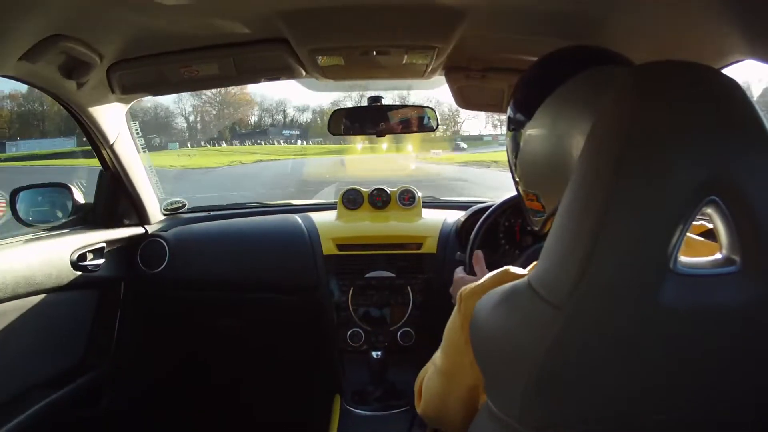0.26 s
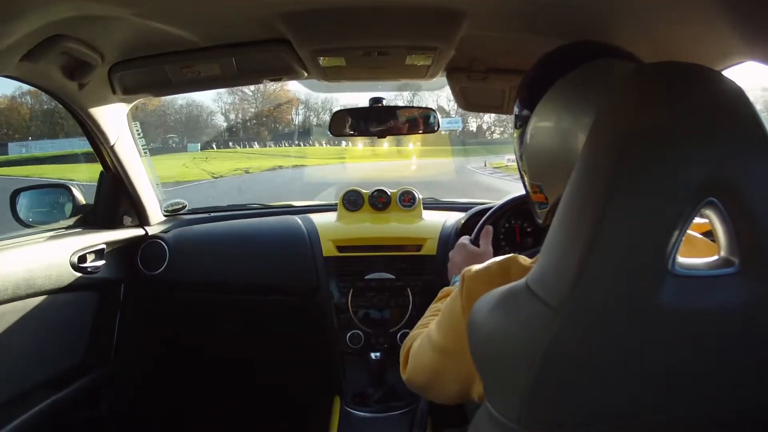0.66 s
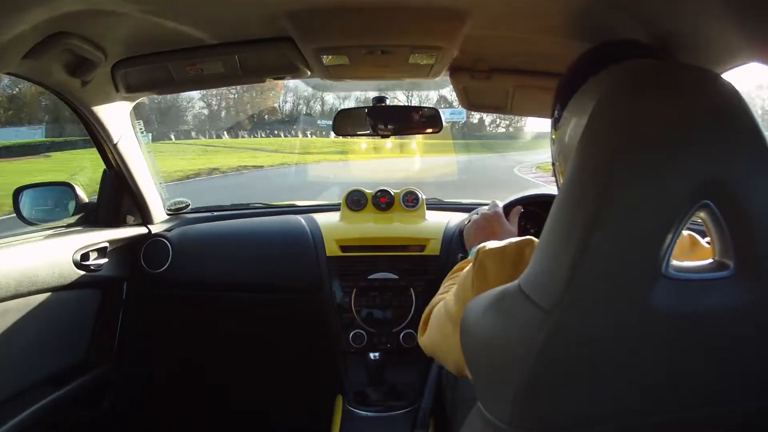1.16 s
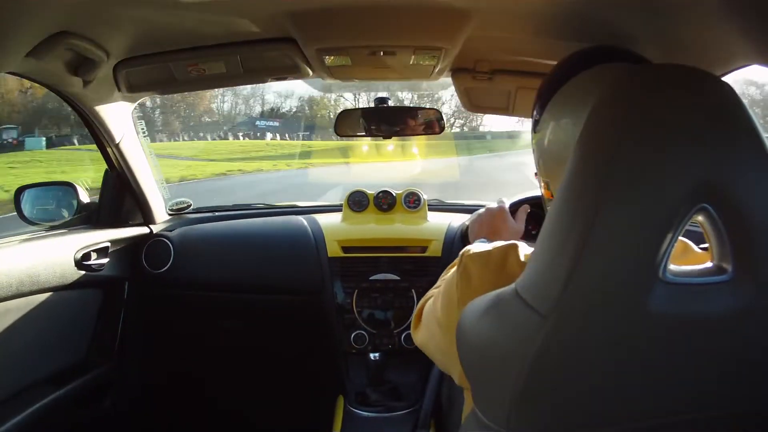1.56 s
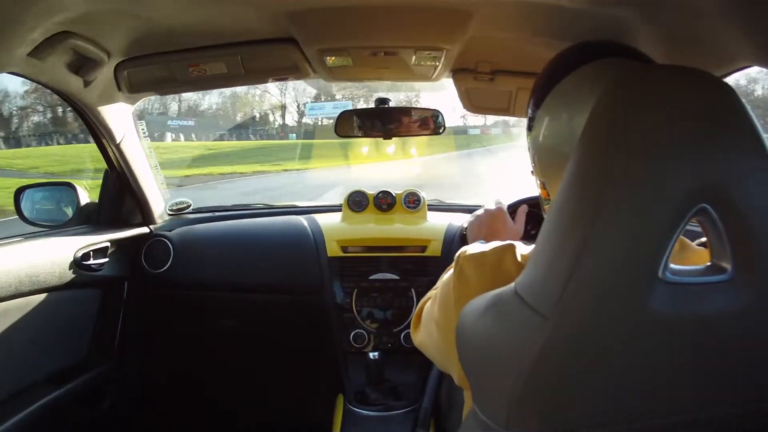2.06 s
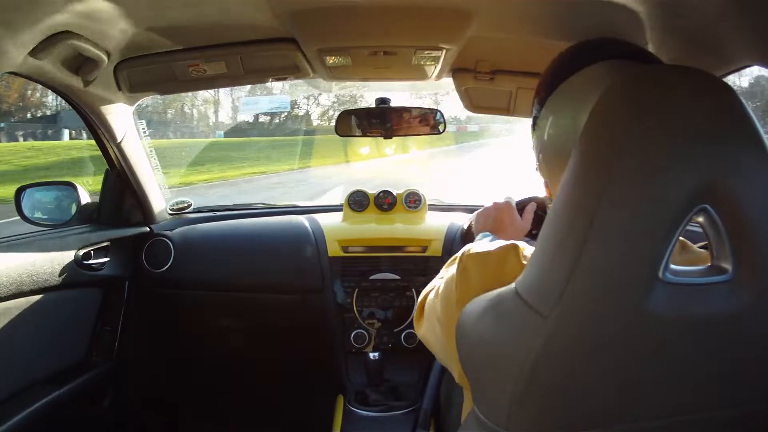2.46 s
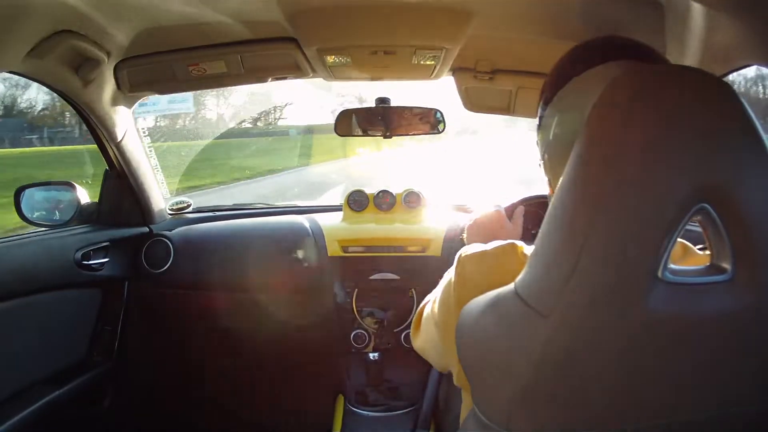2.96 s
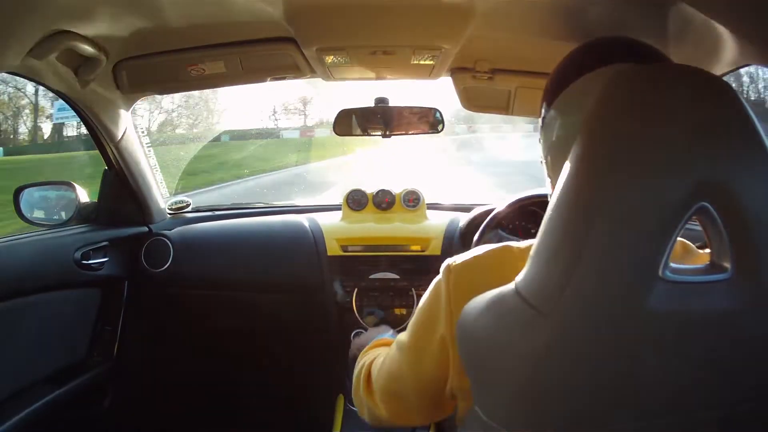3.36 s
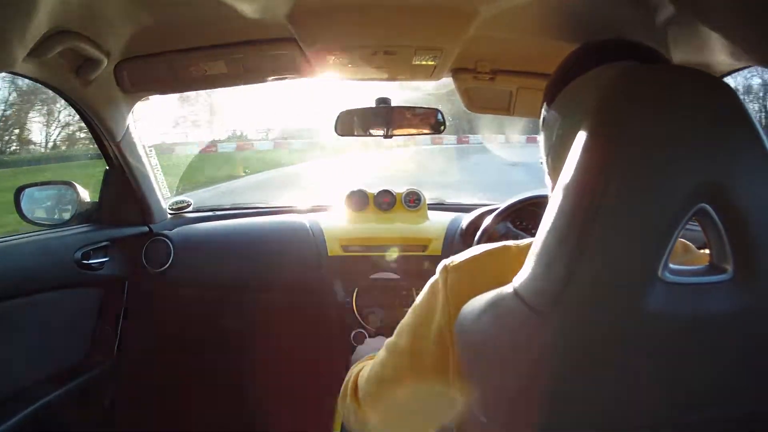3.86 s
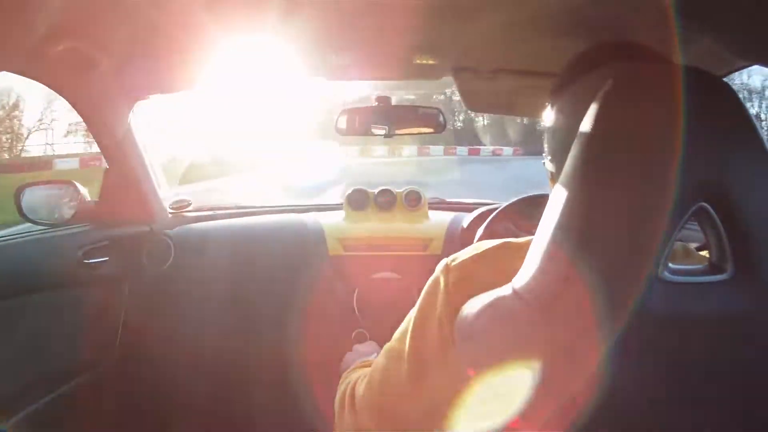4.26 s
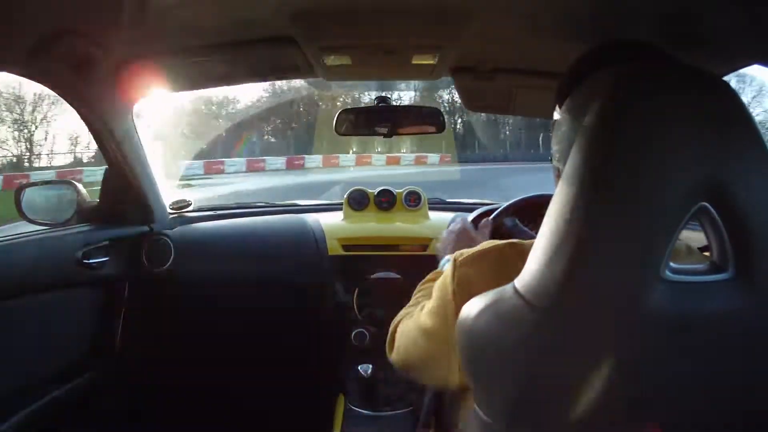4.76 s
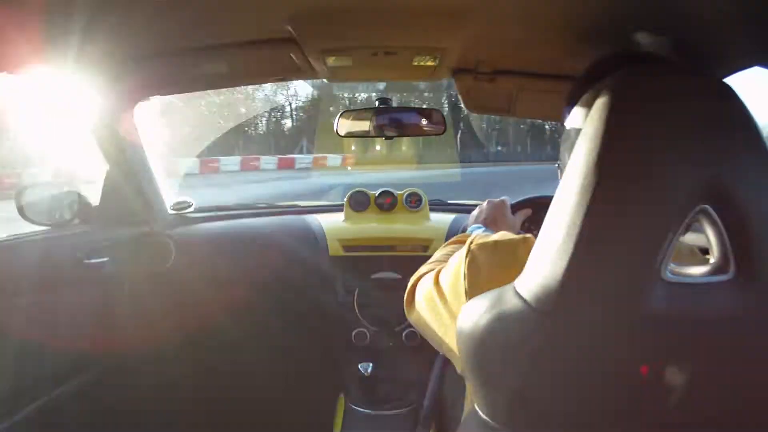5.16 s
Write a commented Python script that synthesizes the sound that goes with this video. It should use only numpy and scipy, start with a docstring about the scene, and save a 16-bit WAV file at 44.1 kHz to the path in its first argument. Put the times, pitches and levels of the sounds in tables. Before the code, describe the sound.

Inside a closed car on a circuit, a smooth rotary engine hum and driveline whine slide down as the car slows, under heavy low air buffeting and tyre rumble. Ticks and thumps come early, trim knocks around 1.4 seconds. The throttle is blipped at about 4.1 seconds and again just after 5, with light tyre scrub. One dull, hissing cabin microphone.

```python
"""Inside a closed car slowing for a corner on a circuit, heard through one dull, hissing microphone.
From the start a two-rotor engine hums (sines at multiples of its shaft speed), the driveline whines and the
tyres hum (sines that fall with road speed), and coloured noise makes the air pressure, boom and tyre roar.
Small ticks, rough swells of noise and low thumps soon join in; trim knocks follow from 1.4 s.
The engine is blipped at about 4.1 s and again after 5 s, as the tyres scrub on turning in."""
import sys
import numpy as np
from scipy.fft import rfft, irfft, next_fast_len
from scipy.io import wavfile
from scipy.ndimage import map_coordinates

SR = 44100
rng = np.random.default_rng(int(sys.argv[2]) if len(sys.argv) > 2 else 0)


def output_pcm(signal):
    """Save a mono or channel-first signal as 16-bit PCM at the path in sys.argv[1].

    Samples are clipped to [-1, 1] before scaling.
    """
    pcm = np.clip(np.atleast_2d(signal).T, -1, 1) * 32767
    wavfile.write(sys.argv[1], SR, np.round(pcm).astype(np.int16))


N = 238713  # length in samples

# engine shaft speed: t/s, f/Hz
SHAFT_SPEED = [(0.0, 120.3), (0.6, 118.0), (1.2, 116.4), (1.7, 113.7), (2.2, 112.9), (2.7, 111.7),
               (3.2, 108.7), (3.7, 105.3), (4.02, 99.7), (4.13, 115.0), (4.3, 111.6), (4.5, 106.9),
               (4.75, 100.7), (4.95, 96.7), (5.1, 108.3), (5.3, 119.4), (5.41, 118.9)]
# engine strength before cabin colour: t/s, second order level/dB, third order level/dB, upper orders level/dB
ENGINE_LOAD = [(0.0, -31, -35.5, -58.5), (.25, -32.5, -34, -45), (.55, -33, -36, -49),
               (.8, -29.5, -33.5, -46), (1.15, -37.5, -33.5, -44), (1.3, -31, -44.5, -51),
               (1.62, -41, -35.5, -49.5), (1.78, -51, -34.5, -40), (2.1, -34.5, -39, -48),
               (2.4, -36, -35.5, -51.5), (2.8, -35, -38.5, -52.5), (3.4, -30.5, -47, -49),
               (3.8, -32.5, -49, -54), (4.02, -25.5, -45, -53), (4.08, -16.5, -32, -46),
               (4.14, -21.5, -35, -39.5), (4.25, -33.5, -46, -51), (4.6, -29.5, -37, -54),
               (4.9, -36.5, -57, -49), (5.08, -23.5, -35, -54), (5.25, -45.5, -40.5, -53)]
# upper engine orders: multiple of shaft speed, level/dB relative to the upper orders' strength
UPPER_ORDERS = [(4, 3), (5, -1), (6, -0.5), (8, -19), (10, -20.5)]
# how the cabin favours some pitches of the engine: f/Hz, level/dB
CABIN_COLOUR = [(190, -1), (215, 3), (260, -4.5), (310, -5), (350, 1.5), (390, 3.5), (430, 4), (480, -6.5),
                (522, 1), (600, -4.5), (700, 1), (1000, 2.5)]
# driveline whine pitch: t/s, f/Hz
WHINE_PITCH = [(0.0, 276.4), (0.6, 273.0), (1.4, 266.5), (2.16, 262.0), (2.7, 260.3), (3.2, 253.0),
               (3.95, 242.9), (4.4, 236.1), (4.8, 225.0), (5.1, 214.9), (5.41, 197.8)]
# rolling tones: t/s, whine level/dB, its octave level/dB, tyre hum level/dB, its octave level/dB
ROLLING_LEVELS = [(0, -49.5, -65.5, -44, -41), (.5, -32, -43.5, -22.5, -39.5), (1.0, -38, -58, -28, -31),
                  (1.3, -42.5, -49.5, -34, -45), (1.7, -37, -43, -24.5, -26),
                  (2.2, -32.5, -42.5, -31.5, -35.5), (2.8, -32.5, -37, -27, -29.5),
                  (3.3, -33.5, -45, -33, -29.5), (3.9, -34, -39.5, -35, -33), (4.15, -31, -51, -29, -32.5),
                  (4.45, -32.5, -38.5, -24.5, -30.5), (4.62, -31.5, -50.5, -34, -31),
                  (4.9, -31, -32, -35, -28), (5.2, -36.5, -32, -25, -43), (5.41, -25, -49, -23.5, -49)]
# whine two octaves up: t/s, level/dB
WHINE_TWO_OCTAVES_UP = [(0, -64), (.8, -57), (1.1, -72.5), (3.1, -78), (3.6, -61.5), (4.1, -59.5),
                        (4.3, -77.5), (4.9, -78), (5.1, -70), (5.41, -66)]
# a short extra whine, mostly just before the second blip: t/s, f/Hz, level/dB
LATE_WHINE_PATH = [(4.6, 544.5, -68.5), (4.68, 540, -42.5), (4.8, 522, -41), (5.0, 532.5, -39.5),
                   (5.08, 516, -70)]
# road through the body: t/s, pressure buffet level/dB, body boom level/dB, drone level/dB, tyre roar level/dB
ROAD_LEVELS = [(0.0, 2.5, -15.5, -24, -36.5), (.15, -16, -22.5, -28, -35), (.35, -13.5, -21, -27.5, -38),
               (.6, -14, -26, -31.5, -34), (1.1, -15, -26.5, -29.5, -38.5),
               (1.5, -14.5, -23.5, -29.5, -35.5), (2.0, -12.5, -23, -29.5, -36.5),
               (2.4, -15, -26.5, -29, -38), (2.65, -14, -23, -28.5, -39), (3.2, -15, -23.5, -29.5, -38),
               (3.75, -13.5, -24, -30.5, -42), (4.1, -13.5, -22.5, -24, -36.5),
               (4.4, -12.5, -23, -34, -36.5), (4.75, -15, -21, -30.5, -40.5),
               (5.1, -12.5, -26.5, -30.5, -35.5), (5.41, -14.5, -13, -28.5, -37)]
# noise colours of the road layers, from low to high: f/Hz, relative level/dB
BUFFET_COLOUR = [(1.8, -46), (3.0, 2.5), (21, 4), (38, 0.5), (60, -7), (78, -48.5), (130, -120)]
BOOM_COLOUR = [(35, -15.5), (60, 1.5), (103, 1.5), (151, -1.5), (166, -5.5), (185, -19.5), (240, -55),
               (410, -120)]
DRONE_COLOUR = [(110, -40), (185, -5.5), (220, 1), (285, -4.5), (344, -6.5), (376, -16.5), (400, -13.5),
                (520, -37), (880, -120)]
ROAR_COLOUR = [(240, -34), (400, 3), (523, -7.5), (615, -9.5), (693, -13), (747, -15), (900, -20),
               (1170, -61.5), (1980, -120)]
RUSH_COLOUR = [(530, -41), (900, -6.5), (997, 0.5), (1060, -8), (1320, -1), (1420, -9), (1750, -21),
               (2320, -27.5), (3500, -32.5), (4550, -59), (7700, -120)]
# noise colour of the preamp hiss: f/Hz, relative level/dB
HISS_COLOUR = [(1290, -32), (2200, -3), (5150, -4), (6150, -5), (6400, -3), (6880, -4), (9260, -2.5),
               (14300, -2.5), (15000, -3.5)]
# faint steady whistles: f/Hz, level/dB
WHISTLES = [(6476, -89.5), (6525, -82), (9098, -82.5)]
# dry ticks without ring: t/s, step level/dB
TICK_STEPS = [(.021, -30), (0.033, -35), (0.036, -45), (0.044, -40.5), (0.056, -37.5), (0.059, -29.5),
              (0.065, -41), (0.085, -28), (.091, -23.5), (0.097, -31.5), (.166, -34), (.186, -31.5),
              (0.235, -41.5), (.59, -37.5), (0.974, -38.5), (1.631, -36.5), (2.0, -35.5), (3.685, -32.5),
              (3.953, -35), (4.116, -37.5), (4.129, -33), (4.187, -35.5), (4.309, -33.5), (4.66, -38),
              (4.892, -28.5), (5.285, -40), (5.295, -25.5), (5.303, -37.5), (5.351, -45), (5.38, -30),
              (5.403, -28.5)]
# rough swells of noise: t/s, length/s, low part level/dB, middle part level/dB, high part level/dB
ROUGH_SWELLS = [(0.059, 0.094, -26.5, -37.5, -49.5), (0.218, 0.1, -35, -40, -49),
                (1.404, 0.049, -32, -33.5, -46), (1.683, 0.16, -47, -43, -53),
                (4.04, .11, -24, -33.5, -52.5), (4.485, 0.096, -36, -40, -45),
                (5.265, 0.068, -32, -43, -56)]
# the three resonances of the rough swells: f/Hz, width/Hz
ROUGH_RESONANCES = [(350, 170), (540, 200), (860, 260)]
# low thumps, pressure pushes and one exhaust burst:
# t/s, ring f/Hz, level/dB before the soft onset, time to fall 60 dB/s
LOW_THUMPS = [(0.066, 21.2, 2.5, 0.22), (0.083, 96.7, -1.5, 0.42), (.21, 93.3, -3, 0.196),
              (.105, 234.8, -12.5, .3), (.27, 165, -12, 0.19), (4.05, 204.2, -11, 0.32),
              (4.881, 29, 1.5, 0.18), (5.277, 35.9, 1, 0.2), (5.388, 25.3, 1.5, 0.3)]
# trim knocks: t/s, strike level/dB, low modes level/dB, high modes level/dB, time to fall 60 dB/s
TRIM_KNOCKS = [(1.412, -46.5, 34, 14, 0.022), (1.419, -39, 22.5, -10, 0.073), (1.452, -51, 5, -6, .08),
               (1.474, -50, 5, -8, .05), (1.485, -48, 13, -10, .05), (1.497, -39.5, 19, -8, 0.054),
               (1.545, -33.5, 6, -6.5, .015), (1.902, -46, 6.5, -22, .02), (2.126, -37.5, -6, -18.5, .02),
               (5.288, -19, 6, -3, 0.01)]
# trim resonances in low, middle and high groups: f/Hz, width/Hz, level/dB
TRIM_MODES = [
    [(1050, 370, -0.5)],
    [(2760, 1700, 0.0017)],
    [(4800, 990, -2.5), (9000, 8700, -14)],
]
# tyre scrub at turn-in: t/s, length/s, level/dB
SCRUB_SWELLS = [(5.03, .36, -51), (5.055, .04, -55), (5.105, 0.036, -52), (5.18, 0.053, -53),
                (5.265, 0.045, -50)]
# tyre scrub resonances: f/Hz, width/Hz, level/dB
SCRUB_MODES = [(980, 74, 0), (1160, 140, -2)]

WHINE_TO_HUM = 3.38  # whine pitch divided by tyre hum pitch
RUSH_DB = -54
RUSH_FOLLOWS = 0.35  # share of the roar's swings, in dB
HISS_DB = -62.5
TOP_HZ = 15250  # nothing is heard above this


def amp(db):
    """Turns decibels into a gain."""
    return 10 ** (np.asarray(db) / 20)


def unit(x):
    """Scales a sound to an rms strength of 1."""
    return x / np.sqrt(np.mean(x ** 2) + 1e-20)


def curves(rows):
    """Draws straight lines between table rows: one curve for each column after the time."""
    times, *columns = np.transpose(rows)
    return [np.interp(np.arange(N) / SR, times, column) for column in columns]


def wobble(rate):
    """A smooth random curve through `rate` random points a second."""
    points = rng.standard_normal(int(N * rate / SR) + 4)
    return map_coordinates(points, [np.arange(N) * rate / SR])


def filtered(x, response):
    """Changes the strength and phase of each frequency in x by a response curve."""
    size = next_fast_len(N + SR // 2)  # spare room for ringing
    spectrum = rfft(x, size) * response(np.fft.rfftfreq(size, 1 / SR))
    return irfft(spectrum, size)[..., :N]


def noise(colour):
    """Noise of rms 1, coloured along a log frequency axis."""
    f, level_db = np.transpose(colour)

    def response(hz):
        return amp(np.interp(np.log(hz + 1), np.log(f + 1), level_db))
    return unit(filtered(rng.standard_normal(N), response))


def band(peaks):
    """Noise of rms 1 in smooth bell-shaped resonances."""
    def response(hz):
        return sum(amp(db) * np.exp(-2 * ((hz - centre) / width) ** 2) for centre, width, db in peaks)
    return unit(filtered(rng.standard_normal(N), response))


def swells(rows):
    """Loudness curves that rise and fall as half a sine."""
    t = np.arange(N) / SR
    return sum(amp(db) * np.sin(np.pi * np.clip((t - start) / length, 0, 1)) for start, length, db in rows)


def tone(hz, db, sway_db, drift):
    """A sine around rms level db; its strength wanders, and its phase wanders slowly and fast."""
    phase = 2 * np.pi * (np.cumsum(hz * np.ones(N)) / SR + rng.random())
    level = np.sqrt(2) * amp(db + sway_db * wobble(12))
    return level * np.sin(phase + drift * (wobble(7) + 0.74 * wobble(30)))


def cabin_tone(hz, db, sway_db, drift):
    """A tone made louder or softer by the cabin according to its pitch at each moment."""
    return tone(hz, db + np.interp(hz, *np.transpose(CABIN_COLOUR)), sway_db, drift)


def engine():
    """Two firings a shaft turn give the even orders; rotor mismatch gives the odd ones."""
    shaft_hz, = curves(SHAFT_SPEED)
    second_db, third_db, upper_db = curves(ENGINE_LOAD)
    second = cabin_tone(2 * shaft_hz, second_db, sway_db=2.5, drift=.52)
    third = cabin_tone(3 * shaft_hz, third_db, sway_db=1.5, drift=.42)
    upper = sum(cabin_tone(k * shaft_hz, upper_db + db + 1.6 * wobble(2.97), sway_db=1.15, drift=0.49)
                for k, db in UPPER_ORDERS)
    return second + third + upper


def rolling():
    """Driveline whine and tyre hum fall with road speed and ignore the throttle."""
    whine_hz, = curves(WHINE_PITCH)
    whine_db, whine_octave_db, hum_db, hum_octave_db = curves(ROLLING_LEVELS)
    whine_levels = [whine_db, whine_octave_db, *curves(WHINE_TWO_OCTAVES_UP)]
    whine = sum(tone(2 ** k * whine_hz, db, sway_db=1.95, drift=0.43) for k, db in enumerate(whine_levels))
    hum_hz = whine_hz / WHINE_TO_HUM
    hum = sum(tone((k + 1) * hum_hz, db, sway_db=2.6, drift=0.26)
              for k, db in enumerate([hum_db, hum_octave_db]))
    return whine + hum + tone(*curves(LATE_WHINE_PATH), sway_db=1.1, drift=0.31)


def road():
    """The road shakes all layers but the pressure buffet together; each layer also flutters on its own."""
    buffet_db, boom_db, drone_db, roar_db = curves(ROAD_LEVELS)
    rush_db = RUSH_DB + RUSH_FOLLOWS * (roar_db - roar_db.mean())
    shake = wobble(25)
    reach = 0.87  # the largest pressure swings flatten out towards this size
    pressure = amp(buffet_db + 2.1 * wobble(15)) * noise(BUFFET_COLOUR)
    buffet = reach * np.tanh(pressure / reach)
    boom = amp(boom_db + 0.43 * shake + 1.2 * wobble(4.9)) * noise(BOOM_COLOUR)
    drone = amp(drone_db + 0.54 * shake + 0.19 * wobble(40)) * noise(DRONE_COLOUR)
    roar = amp(roar_db + 0.65 * shake + 0.31 * wobble(60)) * noise(ROAR_COLOUR)
    rush = amp(rush_db + 1.0 * shake + 0.33 * wobble(90)) * noise(RUSH_COLOUR)
    return buffet + boom + drone + roar + rush


def ticks():
    """Each tick is a tiny sudden step, up or down, that relaxes within milliseconds."""
    out, t = np.zeros(N + SR), np.arange(400) / SR
    for start, db in TICK_STEPS:
        step = rng.choice([-1, 1]) * amp(db) * np.exp(-t / 0.00057)
        out[round(start * SR):][:len(t)] += step
    return out[:N]


def rough_swells():
    """Brief swells of rough noise, the blip's growl among them, in three resonances."""
    out = np.zeros(N)
    for k, (hz, width_hz) in enumerate(ROUGH_RESONANCES):
        rows = [(start, length, levels[k]) for start, length, *levels in ROUGH_SWELLS]
        out += swells(rows) * band([(hz, width_hz, 0)])
    return out


def thumps():
    """Low thumps, pressure pushes and one exhaust burst swell quickly and ring out as fading sines."""
    out, t = np.zeros(N + SR), np.arange(SR // 2) / SR
    onset = 1 - np.exp(-t / 0.0074)
    for start, hz, db, t60 in LOW_THUMPS:
        ring = amp(db - 60 * t / t60) * np.sin(2 * np.pi * hz * t)
        out[round(start * SR):][:len(t)] += onset * ring
    return out[:N]


def knocks():
    """Short bursts of contact noise ring the plastic trim; each group of modes is struck at its own strength."""
    groups, t = np.zeros((3, N + SR)), np.arange(SR // 10) / SR
    for start, db, low_db, high_db, t60 in TRIM_KNOCKS:
        burst = amp(db - 60 * t / t60) * rng.standard_normal(len(t))
        first = round(start * SR)
        groups[:, first:first + len(t)] += amp([[low_db], [0], [high_db]]) * burst

    def resonance(f, centre, width):
        return 1j * f * width / (centre * centre - f * f + 1j * f * width)

    def ring(strike, modes):
        # every resonance acts twice, so sound away from its centre fades steeply
        return filtered(strike, lambda f: sum(amp(db) * resonance(f, centre, width) ** 2
                                              for centre, width, db in modes))
    return sum(ring(group[:N], modes) for group, modes in zip(groups, TRIM_MODES))


def tyre_scrub():
    """The tyres scrub as swells of rough, fluttering noise in two resonances."""
    return swells(SCRUB_SWELLS) * band(SCRUB_MODES) * amp(1.6 * wobble(40))


def scene():
    """Adds everything in the cabin at one microphone."""
    steady = engine() + rolling() + road()
    brief = ticks() + rough_swells() + thumps() + knocks() + tyre_scrub()
    return (steady + brief)[None]


def record(dry):
    """Adds preamp hiss and whistles, clips hard (sooner on the negative side), fades the end and cuts the top."""
    hiss = amp(HISS_DB + 0.46 * wobble(65)) * noise(HISS_COLOUR)
    whistles = sum(tone(hz, db, sway_db=1.5, drift=.6) for hz, db in WHISTLES)
    wet = np.clip(dry + hiss + whistles, -.81, .999)
    to_end = (N - np.arange(N)) / (.008 * SR)  # the fade lasts 8 ms
    fade = np.sin(np.pi / 2 * np.clip(to_end, 0, 1)) ** 2
    return filtered(wet * fade, lambda hz: hz < TOP_HZ)


dry = scene()
out = record(dry)
output_pcm(out)
```